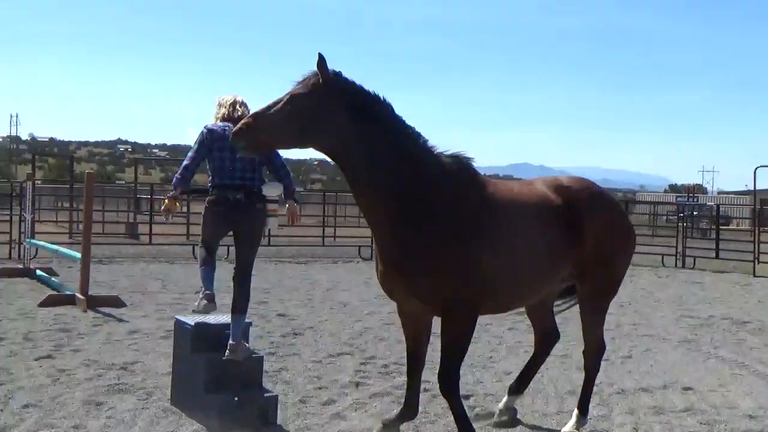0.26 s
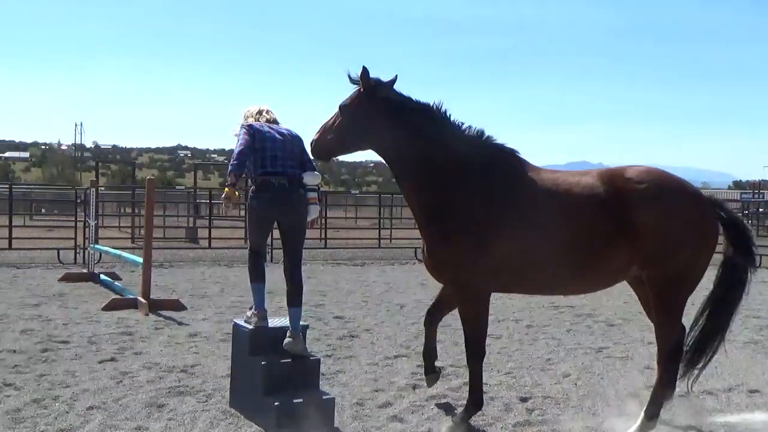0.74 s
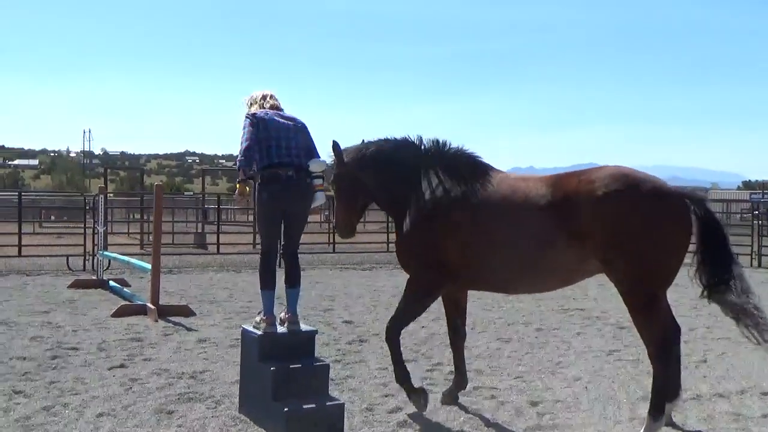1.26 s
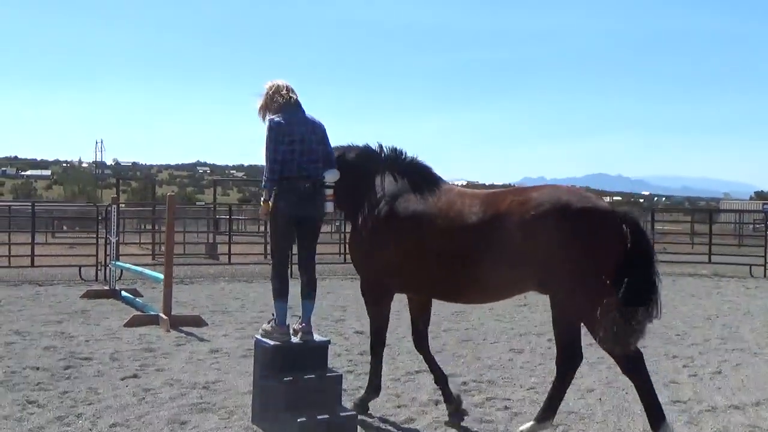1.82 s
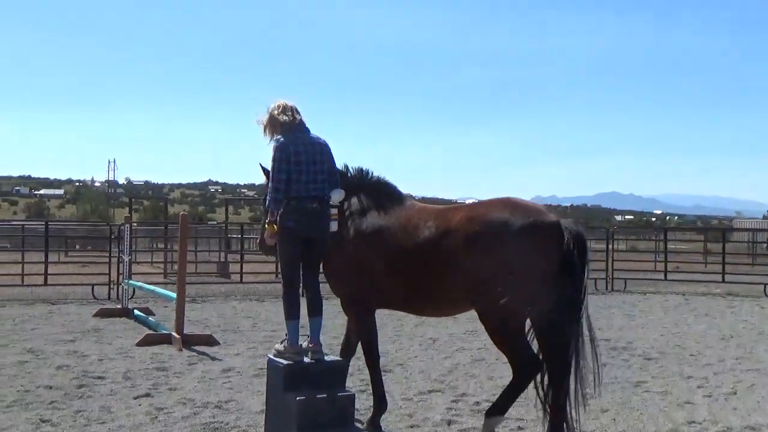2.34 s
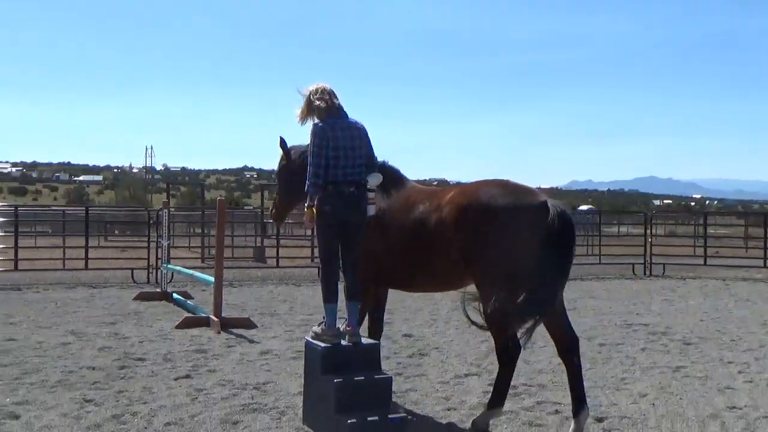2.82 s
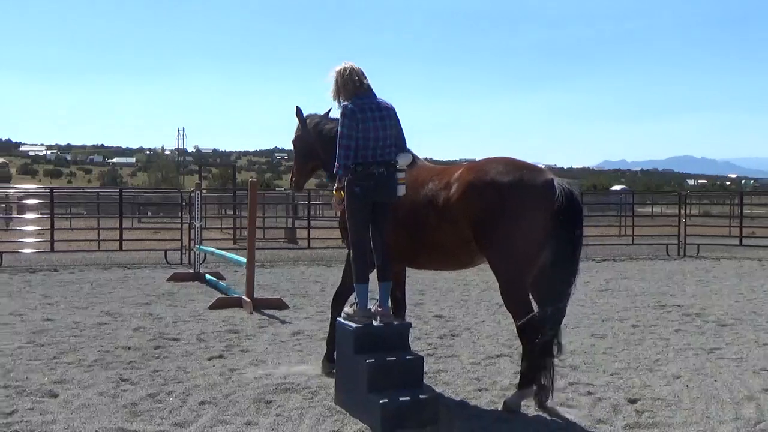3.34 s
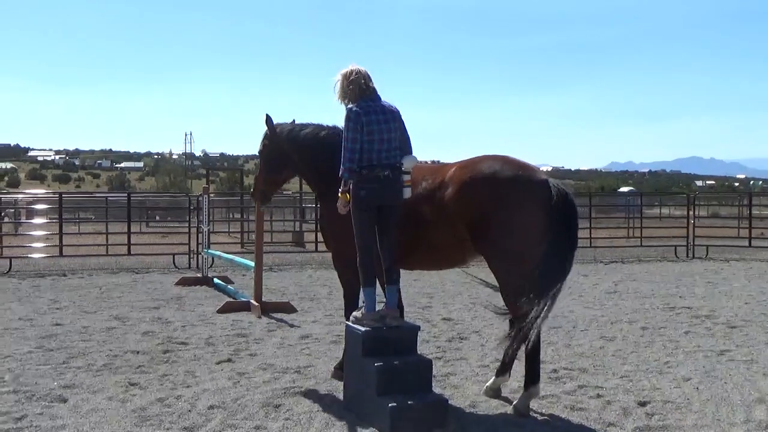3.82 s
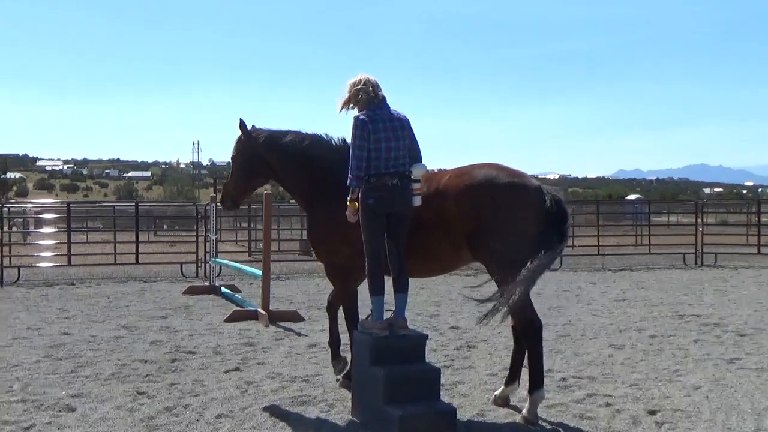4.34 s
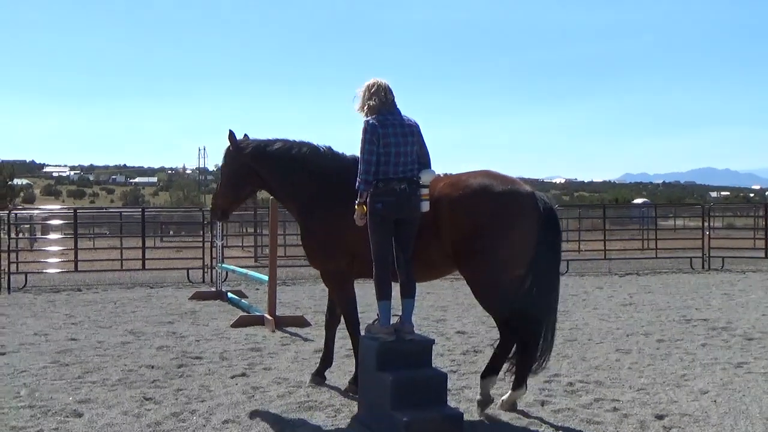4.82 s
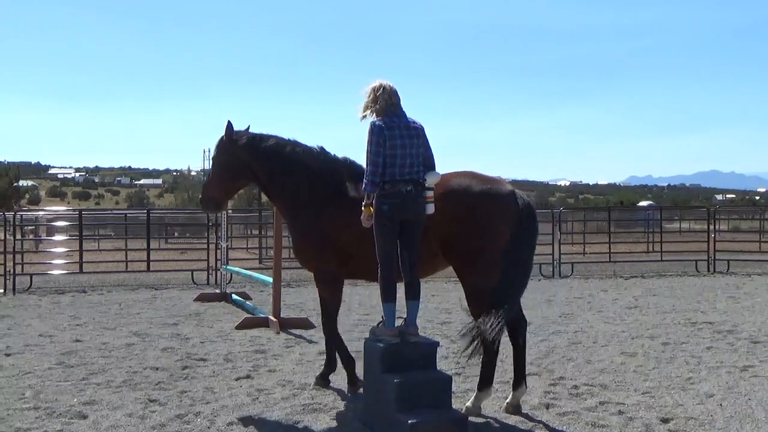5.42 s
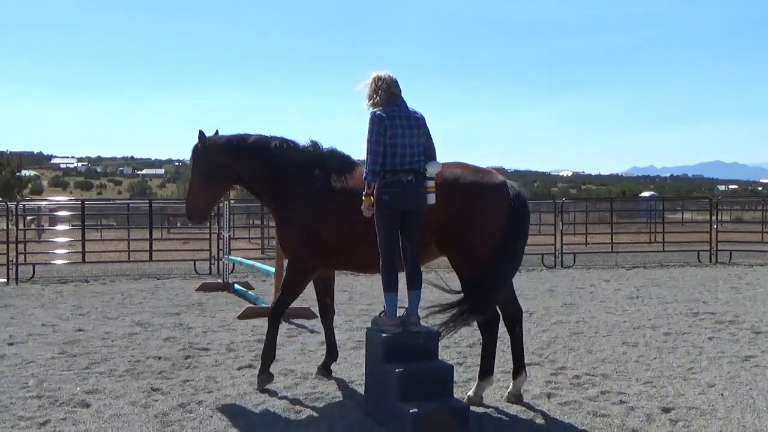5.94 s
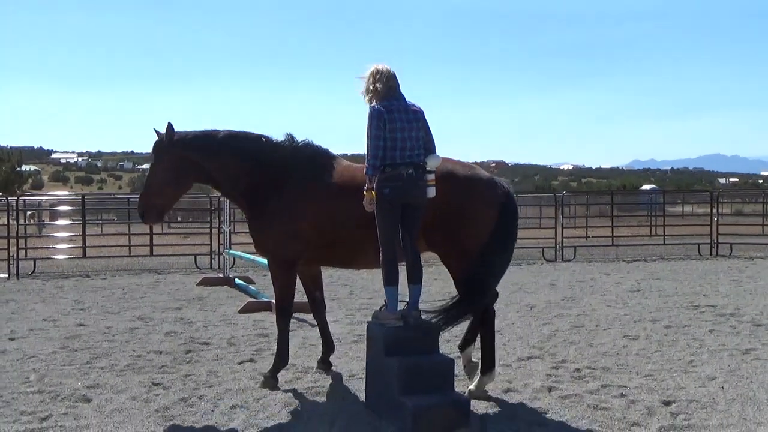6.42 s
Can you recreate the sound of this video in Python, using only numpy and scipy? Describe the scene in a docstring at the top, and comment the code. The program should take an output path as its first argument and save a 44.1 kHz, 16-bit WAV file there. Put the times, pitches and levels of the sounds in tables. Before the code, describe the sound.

Outdoors, low wind rumble surges and drops over a horse scuffing through gritty sand; small stones click and a bird chirps once faintly.

```python
"""Wind roars in lumps at the microphone ports: noise bands driven by gusts, single eddies and random drifts.
A horse walks and scuffs through the sand of an outdoor arena: sparse clicks hiss in drags and crunches.
Pebbles tick (a click and a short noise rattle), a small bird gives one falling sine chirp,
and a faint noise floor stands for open country and the microphone."""
import sys
import numpy as np
from scipy import signal
from scipy.io import wavfile

SR = 44100
rng = np.random.default_rng(int(sys.argv[2]) if len(sys.argv) > 2 else 0)


def wrap_up_sound(samples):
    """Save the sound to the file named by the first command line argument, as 16-bit audio."""
    columns = np.atleast_2d(samples).T
    # keep every value between -1 and 1, then stretch to whole-number steps
    tamed = np.clip(columns, -1, 1)
    steps = np.round(tamed * 32767).astype(np.int16)
    wavfile.write(sys.argv[1], SR, steps)


N = 294147

# gusts: (peak time [s], peak level [dB], rise [s], fall [s], treble tilt [dB/octave])
GUSTS = [(0.0, -14, .02, 0.041, 5.5), (0.2, -18, 0.32, 0.1, 10), (0.31, -17.5, 0.14, 0.084, 9.5),
         (0.428, -15.5, 0.066, 0.017, 16), (0.5, -9, 0.046, 0.013, 5), (0.589, -14.5, 0.023, 0.43, 4.5),
         (0.8, -21.5, 0.31, 0.053, 8.5), (0.97, -32.5, 0.0097, 0.33, 8), (1.27, -22.5, 0.26, .07, 6),
         (1.344, -20, 0.097, 0.011, 13.5), (1.41, -21, 0.047, 0.31, 4), (1.55, -18, 0.24, 0.22, 3),
         (1.73, -25.5, 0.49, 0.044, 7.5), (1.929, -25, 0.032, 0.011, -3), (2.06, -26.5, 0.082, 0.15, 0),
         (2.34, -20.5, 0.18, 0.051, -5), (2.748, -11.5, 0.42, 0.07, 6.5), (3.03, -18, 0.3, 0.066, 2.5),
         (3.109, -17.5, 0.11, 0.11, 0.5), (3.24, -18.5, 0.19, 0.16, 1), (3.59, -24.5, 0.52, 0.2, -1),
         (3.71, -25, .14, 0.084, -1), (3.94, -22, 0.21, 0.17, 2), (4.045, -21, .15, 0.043, 1),
         (4.479, -8, 0.23, 0.088, 7), (4.61, -9.5, 0.081, 0.074, 5), (4.702, -21, 0.41, 0.08, 4),
         (5.069, -22, 0.13, .035, 3), (5.37, -14, 0.24, 0.15, -2), (5.55, -12.5, 0.37, 0.058, 4.5),
         (5.66, -10, 0.1, 0.086, 4), (5.82, -18.5, 0.052, 0.16, 3.5), (5.914, -13.5, 0.26, 0.015, 4),
         (6.059, -19, 0.16, 0.053, 1), (6.17, -11, 0.012, 0.084, 3.5), (6.215, -20, 0.11, 0.44, 3.5),
         (6.4, -34, 0.23, 0.053, -5), (6.55, -26.5, 0.065, 0.11, -6), (6.67, -26, 0.043, .02, -3)]
# single eddies: (time [s], relative peak level [dB], length in the bass [s], tilt [dB/octave])
EDDIES = [(0.066, -7, 0.015, -8), (0.083, -2, 0.053, 3), (0.157, -2, 0.03, 4), (0.293, 3, 0.014, -2),
          (0.365, 0, 0.03, 6), (0.399, -7, 0.036, -8.5), (0.426, -5, 0.013, 10), (0.576, -8.5, 0.018, -12),
          (0.671, -3, 0.0043, 5), (0.699, -5.5, 0.016, 9), (0.736, -7.5, 0.037, -7), (0.87, -19, 0.013, 9),
          (0.959, -6.5, 0.014, 1), (0.981, -6.5, 0.027, -2), (1.044, -8.5, 0.0083, -15.5),
          (1.06, -13, 0.011, 15.5), (1.095, -8.5, 0.017, -1.5), (1.133, -16.5, 0.013, -16.5),
          (1.172, -2.5, 0.028, 3.5), (1.209, -7, 0.0073, 10), (1.238, -0.5, 0.019, -0.5),
          (1.462, -8, 0.013, 2), (1.593, -4.5, 0.023, 8.5), (1.658, -2.5, 0.028, 7.5),
          (1.665, -5.5, 0.046, 2.5), (1.713, -2, 0.019, 3.5), (1.769, -7.5, 0.0072, 1),
          (1.985, -23.5, 0.022, -18), (2.042, -21, 0.042, -17.5), (2.071, -10.5, 0.014, -11.5),
          (2.215, -12, 0.0094, -8), (2.278, -20.5, 0.012, -26), (2.321, -10, 0.057, 4.5),
          (2.549, -5, 0.015, -9), (2.595, -4.5, 0.012, 10.5), (2.645, -1, 0.019, 2),
          (2.661, -4, 0.021, 6.5), (2.906, -8.5, 0.029, 8.5), (2.986, -8.5, 0.014, -12),
          (3.361, -14.5, 0.04, -3), (3.465, -13.5, 0.039, -8), (3.56, -13, 0.042, -11),
          (3.673, -2.5, 0.01, -1.5), (3.706, -4.5, 0.011, -1.5), (3.924, -13, 0.04, -5),
          (4.173, -16, 0.022, -8.5), (4.239, -9, 0.041, -1), (4.264, -5.5, 0.024, 2),
          (4.304, -4.5, 0.0096, -3), (4.332, 1.5, 0.021, 2), (4.369, 3.5, 0.015, 2.5), (4.41, -7, 0.027, 9),
          (4.507, -4.5, 0.032, 4), (4.599, -4, 0.024, 9.5), (4.679, -6, 0.039, 0.5),
          (4.79, -19.5, 0.013, -11), (4.855, -16.5, 0.031, -13), (4.892, -20, 0.03, -14),
          (5.03, -3, 0.016, -2.5), (5.062, -1.5, 0.012, -4), (5.176, -15.5, 0.035, -7),
          (5.288, -9.5, 0.016, -4), (5.325, 2.5, 0.011, -4), (5.369, -2.5, 0.054, 8),
          (5.416, -0.5, 0.021, 3.5), (5.469, -1, 0.028, 7), (5.544, 0, 0.033, 7), (5.638, -3, 0.025, 12.5),
          (5.669, -0.5, 0.011, 5), (5.752, -1.5, 0.038, 4), (5.83, -20, 0.01, -1), (5.95, -8, 0.042, 6),
          (6.026, -7, 0.026, 6.5), (6.158, -2.5, 0.014, -0.5), (6.396, -16.5, 0.013, -10),
          (6.453, -10.5, 0.018, -5.5)]
# bass weight at a roar of -21.5 dB: (time [s], rise per octave downwards [dB/octave])
BASS_WEIGHT = [(0, 5.5), (0.6, -0.5), (1.4, 0.5), (1.9, 1), (2.3, 5.5), (2.7, 3), (3.2, 3), (3.9, 1),
               (4.8, 2), (5.5, 3.5), (6.0, 0.5), (6.67, 0.5)]
# roar spectrum: (frequency [Hz], relative density [dB/Hz])
ROAR_SPECTRUM = [(25, -40), (60, -16), (110, -6), (250, 2), (420, 5.5), (580, -1.5), (900, -16.5),
                 (1460, -36.5), (2200, -45.5), (3200, -65.5), (4500, -73.5), (6500, -80.5)]
# left-right balance of the wind: (time [s], left minus right [dB])
WIND_LEAN = [(0.0, 1.0), (1.73, 1), (2.13, 1.5), (3.94, 0.0), (6.67, 0)]
ROAR_CENTRE_HZ = 455
CALM_DB, CALM_TILT_DB_PER_OCTAVE = -43, -11   # the roar between gusts
BASS_DB_PER_OCTAVE_PER_ROAR_DB = -0.35


def wind(lumps_db=5.5, fine_db=4.0, own_db=1.5, spiky_per_octave=0.19, crackle_db=2.0, eddy_db=-7):
    """Turbulence at the ports: gusts, single eddies and small lumps that swing wider in the treble."""
    gusts, calm = swells(GUSTS), from_db(CALM_DB) ** 2
    total = gusts.sum(axis=0) + calm
    roar_db = full_rate(10 * np.log10(total))
    # tilt averaged by power
    gust_tilts = np.array(GUSTS)[:, -1]
    treble = full_rate((gust_tilts @ gusts + CALM_TILT_DB_PER_OCTAVE * calm) / total)
    bass = in_time(BASS_WEIGHT)[0] + BASS_DB_PER_OCTAVE_PER_ROAR_DB * (roar_db + 21.5)
    lumps = lumps_db * drift(25.7) + fine_db * drift(66)
    crackle = crackle_db * np.clip(drift(230), -3, 1.8)   # smallest eddies, treble only

    def gain(hz):
        octaves = np.log2(hz / ROAR_CENTRE_HZ)
        up = np.clip(octaves, 0, 2.5)   # tilt stops growing in the top bands
        db = roar_db + (treble * up if octaves > 0 else -bass * octaves)
        band_lumps = lumps * (0.5 + spiky_per_octave * up)
        power = from_db(db + band_lumps + own_db * drift(10.6)) ** 2
        for s, peak_db, length, tilt in EDDIES:
            length_s = np.clip(length / (1 + 0.14 * up), .004, .1)   # shorter in the treble
            band_db = peak_db + eddy_db + tilt * np.clip(octaves, -1, 2.5)
            bump = np.sqrt(np.hanning(int(length_s * SR))) * from_db(band_db)
            i = max(int((s - .005) * SR), 0)   # starts 5 ms early
            power[i:i + len(bump)] += bump[:N - i] ** 2
        return np.sqrt(power) * from_db(crackle * up)

    edges_hz = 24 * 2 ** np.arange(0, 8.3, .75)
    roar = bank(edges_hz, ROAR_SPECTRUM, rng.standard_normal((2, 2, N)), gain)
    lean_db, = in_time(WIND_LEAN)
    return roar * from_db(lean_db * [[.5], [-.5]])


# running hiss: (time [s], level [dB])
SAND_LEVEL = [(0.0, -45), (0.8, -40.5), (1.26, -42), (2.4, -46.5), (3.6, -58.5), (4.23, -46.5), (4.27, -56),
              (4.68, -53), (5.05, -47.5), (5.26, -50.5), (5.66, -51), (5.7, -59.5), (6.0, -58),
              (6.04, -48.5), (6.58, -51.5), (6.67, -52)]
# a hoof drags through the sand: (peak time [s], peak level [dB], rise [s], fall [s])
DRAGS = [(0.17, -26.5, 0.19, 0.46), (0.37, -24, 0.087, 0.016), (0.48, -28.5, 0.061, 0.22),
         (0.69, -29.5, .05, 0.13), (0.93, -33.5, 0.023, 0.062), (1.32, -40.5, 0.083, 0.086),
         (1.61, -38, 0.25, .3), (1.8, -26, .04, 0.015), (1.91, -37.5, .22, 0.15), (2.17, -42.5, 0.3, 0.13),
         (2.58, -36.5, 0.13, 0.034), (2.71, -44.5, 0.24, 0.67), (2.97, -36.5, 0.013, .026),
         (3.07, -41, 0.11, .25), (3.36, -38.5, 0.48, 0.65), (3.66, -34.5, 0.063, 0.13),
         (4.83, -34.5, 0.014, .03), (4.96, -32, 0.053, .115), (6.66, -37, 0.057, .1)]
# a hoof digs in: (time [s], relative peak level [dB], t60 [s], tilt [dB/octave])
CRUNCHES = [(0.0932, -33, 0.41, -13), (0.159, -38, 0.15, 8), (0.2994, -26, 0.15, -4),
            (0.4589, -26, 0.15, -6), (0.676, -18, 0.12, 4.5), (1.5768, -31, 0.14, 3),
            (1.7699, -15.5, 0.16, -4), (2.4917, -27, 0.36, -8.5), (2.5623, -20, 0.12, -10.5),
            (3.0304, -25, 0.11, -4), (3.6341, -19.5, 0.14, -5), (4.6379, -35.5, 0.41, -0.5),
            (4.8254, -30, 0.11, 7), (4.867, -26, 0.17, -1), (4.9187, -29, 0.15, 2),
            (4.9794, -25, 0.13, -11), (6.6335, -26.5, 0.6, 0)]
# sand spectrum: (frequency [Hz], relative density [dB/Hz])
GRIT_SPECTRUM = [(1200, -11), (1800, -11), (2600, -9), (3600, -5.5), (5000, -1.5), (6500, 4), (8500, 5),
                 (11500, 12.5)]
SAND_TILT_DB_PER_OCTAVE = -8   # at a level of -39.5 dB
SAND_TILT_PER_LEVEL_DB = 0.12


def sand(grains_per_s=9000, spread_db=2.5, patchy_db=2.0, crunch_db=-9):
    """Countless grains click against each other: a running hiss with sudden crunches that die away."""
    drags = full_rate(swells(DRAGS).sum(axis=0))
    level_db = 10 * np.log10(from_db(in_time(SAND_LEVEL)[0]) ** 2 + drags)
    tilt = SAND_TILT_DB_PER_OCTAVE + SAND_TILT_PER_LEVEL_DB * (level_db + 39.5)
    shape = (2, 2, N)
    sizes = from_db(spread_db * np.minimum(rng.exponential(1, shape), 5)) * rng.choice([-1, 1], shape)
    grains = rms_one(sizes * (rng.random(shape) < grains_per_s / SR))
    clumps_db = patchy_db * drift(30)

    def gain(hz):
        octaves = np.log2(hz / 6500)
        power = from_db(level_db + tilt * octaves) ** 2
        for s, peak_db, t60, slope in CRUNCHES:
            i = int(s * SR)
            t = np.arange(min(int(.4 * SR), N - i)) / SR
            decay_db = peak_db + crunch_db + slope * octaves - 60 * t / max(t60, .02)
            tail = from_db(decay_db) * np.minimum(t / 0.0018, 1)   # 1.8 ms attack
            power[i:i + len(t)] += tail ** 2
        return np.sqrt(power) * from_db(clumps_db + patchy_db * drift(9.6))

    return bank(1500 * 2 ** np.arange(0, 3.1, 1 / 3), GRIT_SPECTRUM, grains, gain)


# pebble ticks: (time [s], relative peak level [dB], tilt [dB/octave])
TICKS = [(0.4154, -26.5, 0), (0.4227, -5.5, 1), (0.479, -15, 4), (0.7153, -14, 11), (0.732, -15, 21),
         (0.7675, -23, 16), (0.839, -16, 3.5), (0.8638, -21, 5), (1.3241, -13.5, 2), (1.578, -21.5, -6),
         (2.2648, -22.5, 10), (2.3475, -24.5, 0), (2.9696, -18, 13), (3.456, -21, 5), (3.6341, -2, 2),
         (4.2242, -22.5, 7), (4.9394, -19, -3), (5.101, -29, 5)]


def ticks(t60_s=.015, rattle_db=-19, tick_db=2.0):
    """A pebble cracks: one sharp click, then a few milliseconds of dying rattle."""
    t = np.arange(int(.02 * SR)) / SR
    rattle = rng.standard_normal((len(TICKS), 2, len(t))) * from_db(rattle_db - 60 * t / t60_s)
    rattle[:, 0, 0] = 1   # the click, mid only

    def gain(hz):
        out = np.zeros((2, N))
        for (s, peak_db, tilt), burst in zip(TICKS, rattle):
            i = int(s * SR)
            out[:, i:i + len(t)] += burst * from_db(peak_db + tick_db + tilt * np.log2(hz / 6500))
        return out

    spectrum = [(1200, -15), (3000, 13), (6000, 9.5), (11000, 8)]   # (frequency [Hz], density [dB/Hz])
    # constant sources of alternating polarity: gain is the signal
    return bank(1060 * 2 ** np.arange(0, 3.6, .5), spectrum, [1, -1], gain)


# chirp: (time [s], frequency [Hz], rms level [dB])
CHIRP = [(4.155, 6150, -70), (4.183, 5880, -56), (4.228, 5220, -57), (4.24, 5050, -63), (4.276, 4570, -63),
         (4.283, 4500, -80)]


def bird():
    """A falling sine whistle."""
    hz, db = in_time(CHIRP)
    t = np.arange(N) / SR
    on = (t > CHIRP[0][0]) & (t < CHIRP[-1][0])
    return np.sqrt(2) * on * from_db(db) * np.sin(2 * np.pi * np.cumsum(hz) / SR)


# air spectrum: (frequency [Hz], relative density [dB/Hz])
AIR_SPECTRUM = [(600, 16), (1200, 18.5), (2000, 1), (3600, -32), (5000, -8), (6500, -1), (8500, -12),
                (11500, -10)]
AIR_DB = -50


def air():
    """Faint, nearly steady noise of open country and the microphone."""
    edges_hz = 600 * 2 ** np.arange(0, 4.6, .5)
    noise = rng.standard_normal((2, 2, N))
    return bank(edges_hz, AIR_SPECTRUM, noise, lambda hz: from_db(AIR_DB + 0.83 * drift(3)))


# stereo: (frequency [Hz], left-right likeness [0-1])
LIKENESS = [(30, 1), (125, 0.95), (500, 1), (1000, 0.96), (3000, 0.94), (9000, 0.86)]


def bank(edges_hz, spectrum, source, gain):
    """Band-passes on a mid and a side source, gain(hz) ahead of each; steady white at gain 1 gives rms near 1."""
    centres_hz = np.sqrt(edges_hz[1:] * edges_hz[:-1])
    weights = from_db(at_hz(spectrum, centres_hz))
    weights = weights / np.sqrt(np.sum(weights ** 2 * np.diff(edges_hz)) / (SR / 2))
    out = 0
    for k, hz in enumerate(centres_hz):
        band = signal.butter(2, edges_hz[k:k + 2], "band", fs=SR, output="sos")
        steep_top = signal.butter(4, min(1.4 * edges_hz[k + 1], .45 * SR), fs=SR, output="sos")
        driven = source[k % 2] * gain(hz) + 1e-18   # neighbouring bands use different sources
        mid, side = weights[k] * signal.sosfilt(np.vstack([band, steep_top]), driven)
        alike = np.clip(at_hz(LIKENESS, hz), -1, 1)
        out = out + np.sqrt((1 + alike) / 2) * mid + np.sqrt((1 - alike) / 2) * side * [[1], [-1]]
    return out


SWING_DB, SWING_BEND = 22.5, 1   # loss over one rise or fall; a bend above 1 rounds the top


def swells(rows):
    """Power over time of each swell, falling away from its peak on both sides; every 32nd sample."""
    s, peak_db, rise, fall = np.transpose(rows)[:4, :, None]
    t = np.arange(0, N, 32) / SR - s
    away = np.where(t < 0, -t / np.maximum(rise, .005), t / np.maximum(fall, .005))
    return from_db(peak_db - np.minimum(SWING_DB * away ** SWING_BEND, 90)) ** 2


def full_rate(coarse):
    """From every 32nd sample to all."""
    return np.interp(np.arange(N) / 32, np.arange(len(coarse)), coarse)


def drift(rate_hz):
    """Noise at every 20th sample through a double one-pole low-pass, run in; rms 1."""
    r = np.exp(-2 * np.pi * rate_hz * 20 / SR)
    noise = rng.standard_normal(N // 20 + 2002)
    slow = signal.lfilter([1], [1, -2 * r, r * r], noise)[2000:]
    return np.interp(np.arange(N) / 20, np.arange(len(slow)), rms_one(slow))


def in_time(rows):
    """Columns of a curve, sample by sample."""
    s, *columns = np.transpose(rows)
    return [np.interp(np.arange(N) / SR, s, c) for c in columns]


def at_hz(points, hz):
    """A spectrum read at a frequency, on a log axis."""
    point_hz, values = np.transpose(points)
    return np.interp(np.log(hz), np.log(point_hz), values)


def from_db(db):
    """Decibels to gain."""
    return 10 ** (np.asarray(db) / 20)


def rms_one(x):
    """Scale to rms 1."""
    return x / np.sqrt(np.mean(x ** 2) + 1e-20)


def scene():
    """All sources together."""
    return wind() + sand() + ticks() + air() + bird()


PORT_HZ, PORT_WIDTH_HZ, PORT_DB = 5900, 600, -2   # port resonance, level of the added ring
CUTOFF_HZ = 11020


def record(dry):
    """The port rings a little, peaks are rounded, the top is cut."""
    ring = signal.lfilter(*signal.iirpeak(PORT_HZ, PORT_HZ / PORT_WIDTH_HZ, fs=SR), dry)
    rounded = 0.8 * np.tanh((dry + from_db(PORT_DB) * ring) / 0.96)
    low_pass = signal.ellip(12, .5, 65, CUTOFF_HZ, fs=SR, output="sos")
    return signal.sosfilt(low_pass, rounded)


dry = scene()
out = record(dry)
wrap_up_sound(out)
```